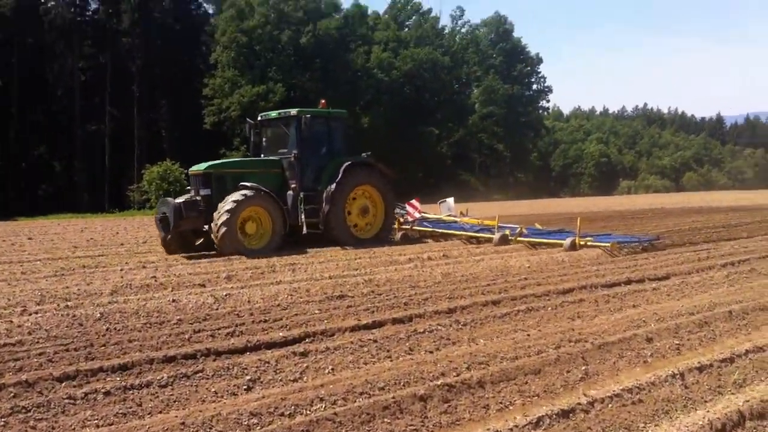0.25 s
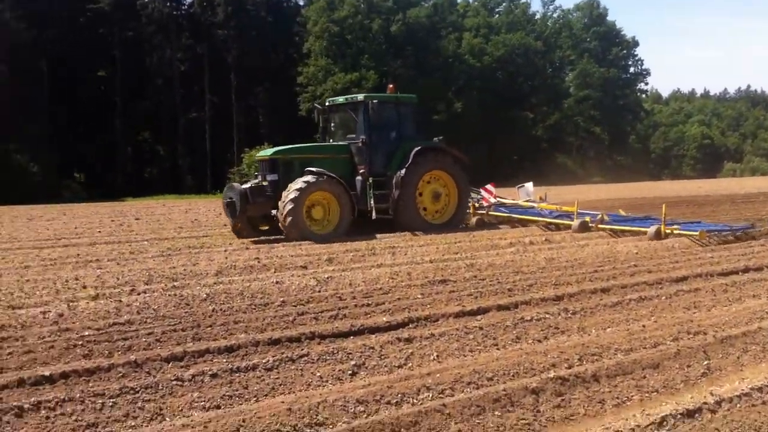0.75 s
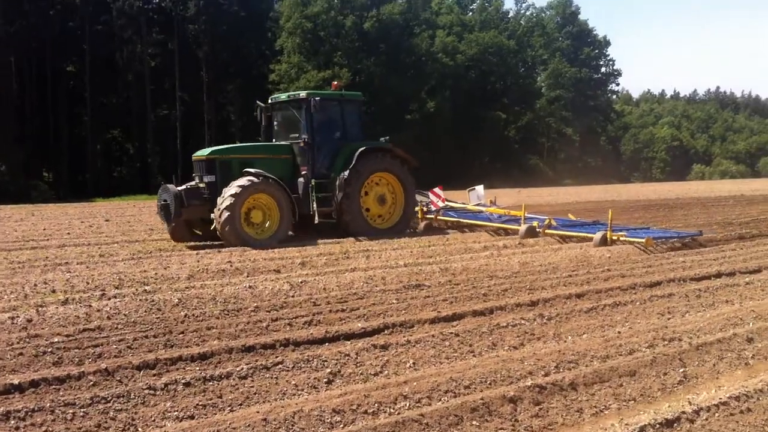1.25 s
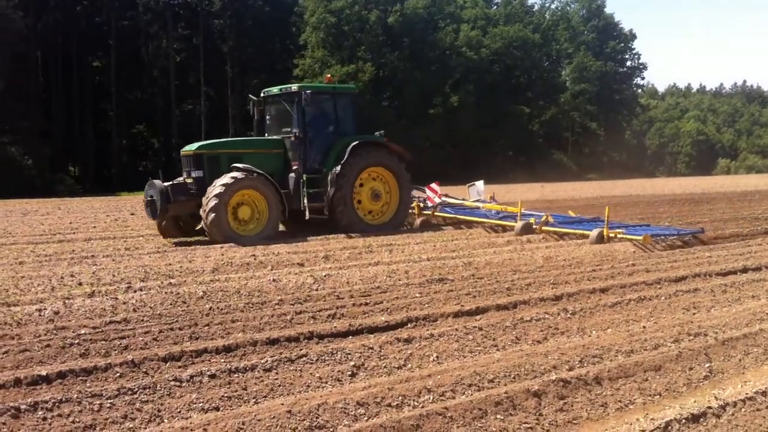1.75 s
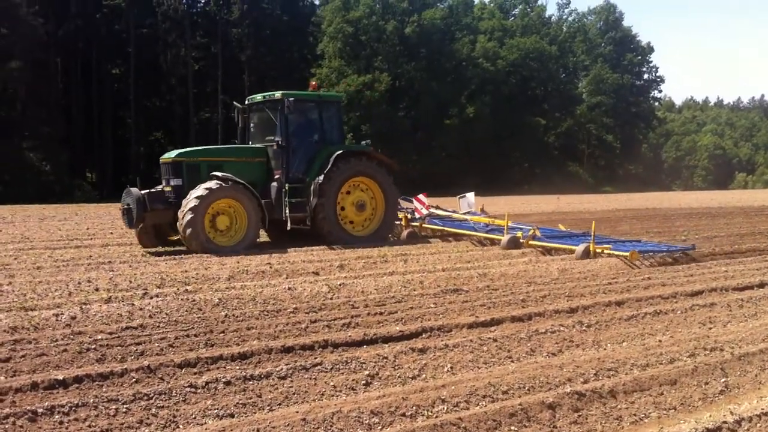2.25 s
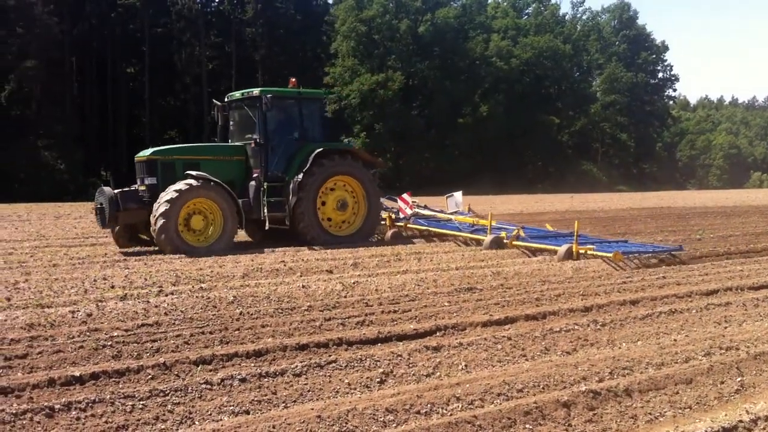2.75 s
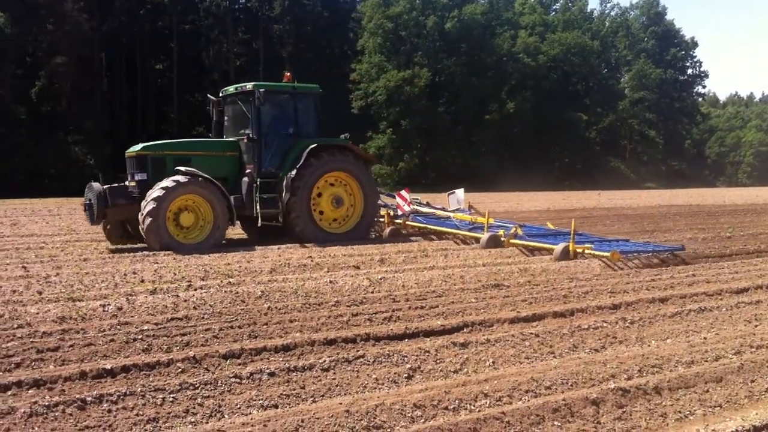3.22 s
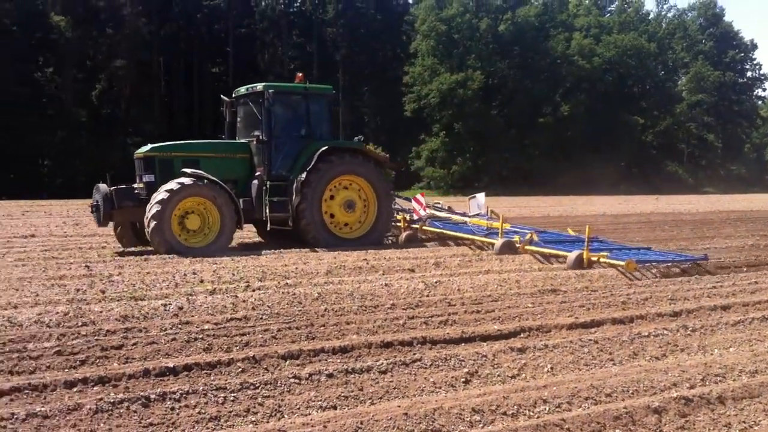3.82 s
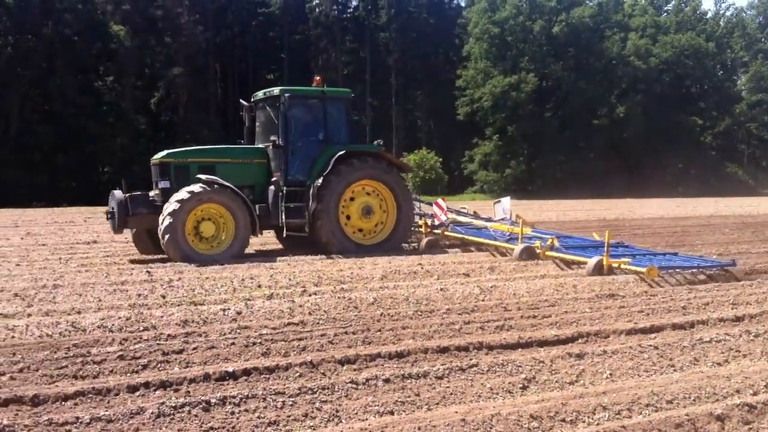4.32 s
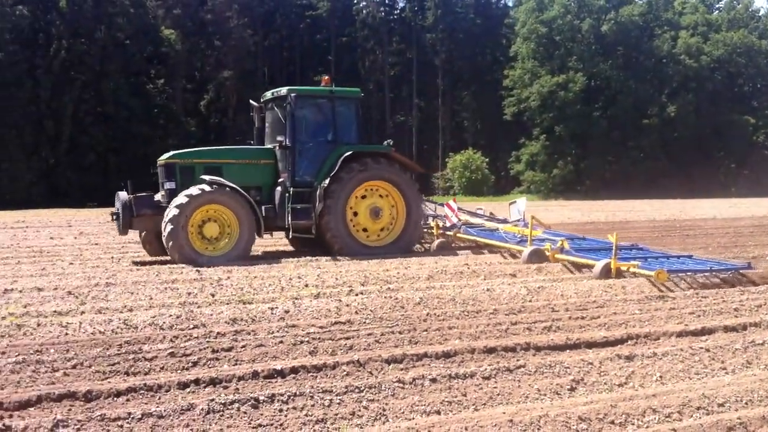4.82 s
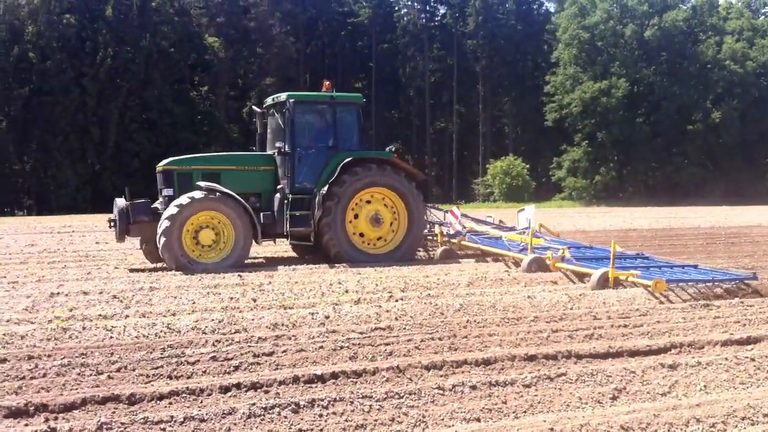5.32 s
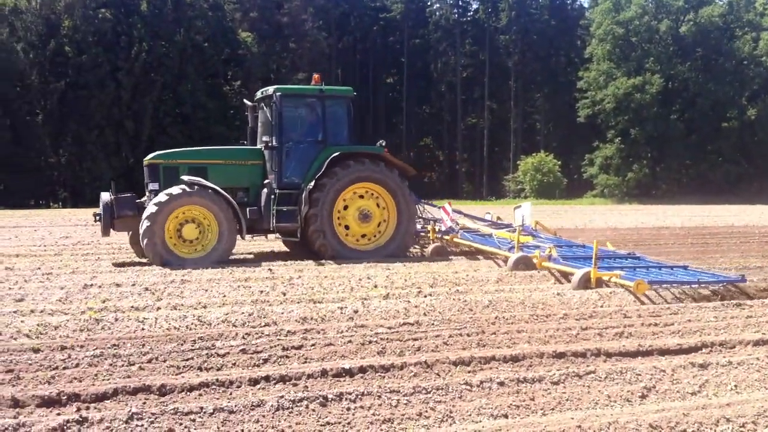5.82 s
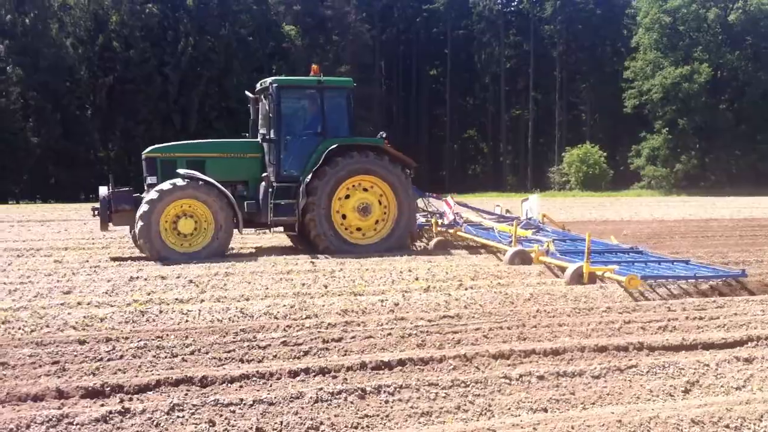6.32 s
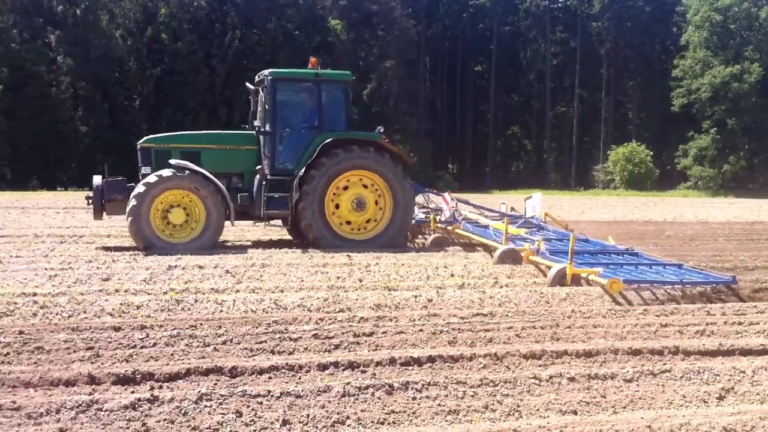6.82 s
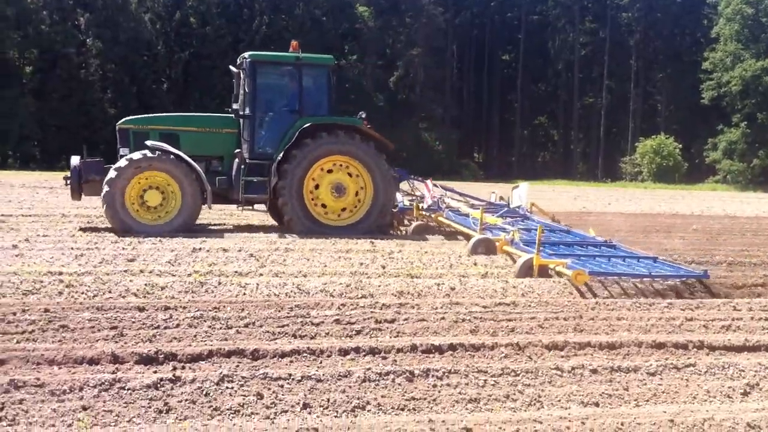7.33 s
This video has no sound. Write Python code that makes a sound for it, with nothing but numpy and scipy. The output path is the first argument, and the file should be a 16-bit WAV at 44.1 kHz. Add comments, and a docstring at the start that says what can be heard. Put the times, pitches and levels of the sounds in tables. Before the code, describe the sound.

Outdoors in an open field, strong wind thumps, rumbles and crackles on an unprotected microphone, loudest in the first three seconds. Behind it a diesel tractor runs at constant speed with a hard, fast, uneven knock and midrange roar. As the gusts thin out, the engine grows clearer and slowly louder, and the fine gritty hiss of a harrow dragged through dry soil rises with it.

```python
"""Gusts of wind slap and buffet a bare microphone; behind them a six-cylinder diesel tractor knocks,
dragging a spring-tine harrow over dry soil and coming slowly abreast. Each firing excites block
resonances with noise that partly repeats every cycle; engine orders are sines. The tines are flickering
bands of grit noise, flicked stones short wave packets. Wind is noise bands in bursts plus low packets."""
import sys
import numpy as np
from scipy import signal
from scipy.io import wavfile
from scipy.ndimage import uniform_filter1d

SR = 44100
rng = np.random.default_rng(int(sys.argv[2]) if len(sys.argv) > 2 else 0)


def master(y):
    """Save y as 16-bit WAV."""
    cut = np.clip(np.atleast_2d(y).T, -1, 1)
    pcm = np.round(cut * 32767)  # scale
    wavfile.write(sys.argv[1], SR, pcm.astype(np.int16))


N = 333837


def undb(db):
    """Amplitude ratio of a level in dB."""
    return 10 ** (np.asarray(db) / 20)


def unit(x):
    """Scale to an RMS of 1."""
    return x / np.sqrt(np.mean(x ** 2))


def curves(table):
    """Columns of a table after t/s, interpolated to one value a sample."""
    s, *columns = np.transpose(table)
    return [np.interp(np.arange(N) / SR, s, c) for c in columns]


def band(x, hz, width_hz):
    """Steep band-pass."""
    edges_hz = np.clip([hz - width_hz / 2, hz + width_hz / 2], 20, SR / 2.2)
    return signal.sosfilt(signal.butter(3, edges_hz, "bandpass", fs=SR, output="sos"), x)


def walk(rate_hz):
    """Random levels, rate_hz a second, joined smoothly; RMS 1."""
    levels = rng.standard_normal(int(N / SR * rate_hz) + 2)
    joined = np.interp(np.arange(N) * rate_hz / SR, np.arange(len(levels)), levels)
    return unit(uniform_filter1d(joined, int(SR / rate_hz / 2)))


def blows(table, cycles):
    """One short wave packet per row (t/s, level/dB, f/Hz); the envelope peaks after `cycles` periods."""
    out = np.zeros(N)
    for (s, db, hz), turn in zip(table, rng.random(len(table))):
        t = np.arange(int(6 * cycles / hz * SR)) / SR * hz / cycles
        at = int(s * SR)
        packet = t * np.exp(1 - t) * np.sin(2 * np.pi * (cycles * t + turn))
        out[at:at + len(t)] += undb(db) * packet[:N - at]
    return out


# cycle rate as heard, dropping slightly by Doppler as the tractor comes abreast: t/s, rate/(cycles/s)
CYCLE_RATE = [(0, 14.2), (3, 14.197), (4.4, 14.187), (5.5, 14.17), (7.57, 14.13)]
# block resonances: f/Hz, width/Hz, level/dB, share repeating each cycle (capped at 0.75 in use),
# knock of cylinders 1-6 over the steady rattle/dB (six columns)
BLOCK_MODES = [(198, 250, -7, 0.33, -6, -12, -11, 30.5, 0, 28),
               (374.3, 61, -8.5, 0.13, 12, -6, 6, 10, -27, 4),
               (708, 103, -3.5, 0.5, -6.5, 6, 9, 3, 10, -21),
               (906, 270, 1.5, 0.42, 6, -11, 6, 4.5, -7, -6.5),
               (1043, 257, -1, 0.42, 4.5, -5, 4, 2.5, -3, -2.5),
               (1264, 180, -9, 0.15, -26, 4, -10, -12, -5, -26),
               (1665, 260, -8.5, 1, 2, 4.5, -3, -10, -1, 3), (1893, 330, -6.5, 0.59, 0, 0, 9, -9, 6, -1),
               (2412, 300, -4.5, 0.81, -2.5, 0, 5, 1, -8, 0), (2626, 292, -3, 1, 4, 5, 13, -6, 9, 9),
               (3276, 380, -16, 0.63, -21, -22, -17, -19, -15, -12),
               (3710, 440, -16.5, 0.11, -16, -19, -16, -8, -16, -13),
               (4904, 440, -13, 0.12, 5, -2, 3, 4.5, -30, -8), (5943, 480, -13, 0.24, 7, 4, 0, -2, 1, -6),
               (6575, 560, -17, 0.27, -5, 3, -2, -35, -12, -27)]
# clean engine orders: multiple of the cycle rate, level over the engine level/dB
ENGINE_ORDERS = [(30, -15), (48, -8), (57, -11), (60, -7.5), (63, -12), (72, -12), (74, -11), (77, -6.5),
                 (82, -14), (88, -16), (96, -19), (124, -18), (132, -15), (166, -17), (176, -15),
                 (180, -20), (190, -16)]
FIRST_FIRES_S = 5.6625  # a firing of cylinder 1; fixes the phase of the cycle
KNOCK_S = 0.0031  # rise time and decay constant of one knock


def engine(boom_db, ring_db):
    """Six knocks a cycle ring the block; part of the rattle repeats from cycle to cycle, part is new."""
    hz, = curves(CYCLE_RATE)
    turns = np.cumsum(hz) / SR
    turns = turns - turns[int(FIRST_FIRES_S * SR)]
    firing = np.floor(6 * turns).astype(int)
    since_s = (6 * turns - firing) / (6 * hz)
    scatter_db = 1.5 * rng.standard_normal(1024)[firing % 1024]
    knock = undb(scatter_db) * since_s / KNOCK_S * np.exp(1 - since_s / KNOCK_S)

    # two repeating patterns cross-fade as the view of the engine turns
    view_rad = 5 * np.arange(N) / N + .3 * walk(2)
    cycle_len = int(SR / hz.mean())
    place = np.round(turns % 1 * cycle_len).astype(int) % cycle_len
    out = 0
    for f, width_hz, db, share, *cylinder_db in BLOCK_MODES:
        share = np.clip(share, 0, .75)
        old, new = rng.standard_normal((2, cycle_len))[:, place]
        repeating = np.cos(view_rad) * old + np.sin(view_rad) * new
        rattle = np.sqrt(share) * repeating + np.sqrt(1 - share) * rng.standard_normal(N)
        ring = band(rattle * (1 + undb(cylinder_db)[firing % 6] * knock), f, width_hz)
        level_db = db + 0.44 * walk(9) + boom_db * (f < 1400) + ring_db * (4500 < f < 6300)
        out = out + undb(level_db) * unit(ring)

    for (order, db), start in zip(ENGINE_ORDERS, rng.random(len(ENGINE_ORDERS))):
        level_db = db + 2 * walk(3) + boom_db * (order < 100)
        out = out + undb(level_db) * np.sqrt(2) * np.sin(2 * np.pi * (order * turns + start))
    return out, knock


def roar():
    """Fan, tyres and soil fill gaps between block modes: a broad roar, strongest near 2.9 kHz, weaker above 4 kHz."""
    out = 0
    # f/Hz, width/Hz, level/dB
    for hz, width_hz, db in [(1530, 400, -16.5), (2200, 480, -14.5), (2887, 220, -12.5),
                             (4330, 680, -19.5), (5400, 750, -19)]:
        out = out + undb(db + 1.2 * walk(9.2)) * unit(band(rng.standard_normal(N), hz, width_hz))
    return out


# tractor: t/s, engine level/dB, boom under 1.4 kHz over it/dB, ring at 5-6 kHz over it/dB
TRACTOR = [(0.0, -42.5, 0, -4), (0.21, -42, -2, 2.5), (0.44, -38.5, -5, -4), (1.12, -43, 1, -2),
           (1.64, -39, -1.5, -4), (2.38, -40, -0.5, -3), (2.61, -38.5, -1, 0.5), (2.95, -42.5, 1.5, -1),
           (3.14, -41.5, 0, 1.5), (4.49, -37.5, -0.5, -2), (6.3, -36.5, 1, 0), (6.89, -35, 0, -2.5),
           (7.57, -35, 0, -4.5)]


def tractor():
    """Block, orders and roar follow one engine level; boom and ring tilt the engine's spectrum."""
    engine_db, boom_db, ring_db = curves(TRACTOR)
    block, knock = engine(boom_db, ring_db)
    return undb(engine_db) * (block + roar()), knock


# spectrum of tines in dry soil: f/Hz, relative density/(dB per Hz)
SOIL = [(3820, -30), (6500, 2), (9330, -5.5), (10900, -2.5), (13100, -6), (15700, -12)]


def harrow(knock):
    """Dense grit on the tines flickers band by band as the frame jolts; a trace of the firing rides on it."""
    hz, db = np.transpose(SOIL)
    jolt = walk(60)
    grit = undb(1.8 * rng.exponential(size=N))
    out = 0
    for f in np.arange(7200, 15700, 700.):
        flicker_db = f / 2.2e4 * (jolt + 2 * walk(45))
        level_db = np.interp(np.log(f), np.log(hz), db) + flicker_db
        out = out + undb(level_db) * band(grit * rng.standard_normal(N), f, 740)
    return unit(out) * (1 + 0.17 * knock)


# tine hiss, growing as the harrow draws near: t/s, level/dB
TINES = [(0.0, -55), (0.46, -52), (0.88, -55), (3.33, -54), (6.03, -49.5), (7.57, -49.5)]
# frame jolts that briefly shift the hiss: t/s, level change/dB
JOLTS = [(.27, 6), (.66, 2), (.77, 4), (1.43, 3), (2.4, -1), (2.62, 4), (2.8, 4), (3.92, 4), (4.11, 1),
         (4.3, 3), (5.1, 2), (5.21, 3.5), (5.4, 3), (6.94, 2), (7.1, 3), (7.29, 4), (7.49, 2)]
JOLT_S, SWAY_DB = 0.014, 0.3  # 1/e half length of a jolt; RMS of the random sway


def tine_db():
    """Level of the hiss: the approach, a slow sway and the jolts."""
    t = np.arange(N) / SR
    approach_db, = curves(TINES)
    jolts_db = sum(db * np.exp(-((t - s) / JOLT_S) ** 2) for s, db in JOLTS)
    return approach_db + SWAY_DB * walk(6.9) + jolts_db


# stones flicked by a tine: t/s, level/dB, f/Hz
STONES = [(1.411, -31, 8150), (7.285, -30, 11600), (7.485, -30, 11700)]


def stones():
    """A flicked stone rings as one short, high wave packet."""
    return blows(STONES, cycles=2.1)


# single eddies slapping the microphone: t/s, level/dB, f/Hz, snap level/dB
SLAPS = [(0.097, -7.5, 293, -30), (0.204, -13, 318, -12.5), (0.223, -14, 254, -14), (0.338, -9, 264, -31),
         (0.405, -13, 260, -0.5), (0.556, -20, 140, -8.5), (0.621, -7, 216, -13), (0.645, -8, 180, -10.5),
         (0.726, -14, 207, -36), (0.869, -7, 234, -16), (0.894, -10, 170, -30), (0.922, -21, 253, -21),
         (0.968, -17, 196, -15), (1.012, -17, 250, -9.5), (1.053, -2.5, 178, -21), (1.12, -21, 218, -9),
         (1.164, -9.5, 210, -22), (1.188, -7, 240, -31), (1.225, -14, 153, -20), (1.468, -6.5, 300, -23),
         (1.548, -7, 147, -10.5), (1.691, -12, 223, -28), (1.812, -10, 212, -11.5),
         (2.049, -26, 196, -11.5), (2.143, -8, 227, -22), (2.296, -6.5, 196, -13), (2.309, -6, 170, -8.5),
         (2.39, -8, 295, -20), (2.423, -12, 240, -12), (2.534, -7, 296, -31), (2.636, -19, 187, -16),
         (2.705, -13, 153, -13), (2.813, -23, 227, -13.5), (2.828, -6, 182, -7), (3.319, -12.5, 223, -23),
         (3.417, -16, 286, -24), (3.653, -10, 266, -30), (3.977, -14, 139, -17), (4.362, -14, 160, -19),
         (4.479, -8, 241, -26), (4.53, -7, 314, -36), (4.57, -9.5, 200, -32), (4.929, -7.5, 221, -17),
         (4.968, -10, 222, -36), (4.989, -10.5, 256, -32), (5.064, -12.5, 195, -31), (6.9, -20, 242, -32),
         (6.939, -10.5, 163, -20)]


def slaps():
    """An eddy hits the microphone: a low swing, its sharp front a quick one at three times the pitch."""
    s, level_db, hz, snap_db = np.transpose(SLAPS)
    snaps = blows(np.c_[s + .002, snap_db, 3 * hz], cycles=.6)
    return blows(np.c_[s, level_db, hz], cycles=0.49) + snaps


def wind():
    """Eddies roll over the port: rumble bursts that tilt with brightness, crackle and slaps."""
    gust_db, bright_db, torn = gusts()
    eddy, flare = walk(80), walk(220)
    rumble = 0
    # f/Hz, width/Hz, level/dB, tilt/(dB per dB of brightness), flare/dB
    for hz, width_hz, db, tilt, flare_db in [
            (71.6, 21, -23.0, 0.22, 1.1), (127.4, 73.6, -6, 0.32, 0.57), (181.4, 89.6, 1, 0.0074, 0.56),
            (277.8, 125, -1.0, 0.029, 1.9), (389.7, 159, -1.5, 0.78, 4.5), (532, 220, -3.0, 1.19, 0.72),
            (723, 230, -7, 1.85, 1.1)]:
        burst = undb(0.32 * eddy + flare_db * flare)
        noise = unit(band(burst * rng.standard_normal(N), hz, width_hz))
        rumble = rumble + undb(db + tilt * bright_db) * noise

    tearing = undb(3.5 * flare) * rng.standard_normal(N)
    crackle = 0
    # f/Hz, width/Hz, level/dB
    for hz, width_hz, db in [(796, 308, -13), (1285, 430, -18.5), (1883, 840, -23.5), (2730, 1700, -36)]:
        crackle = crackle + undb(db) * unit(band(tearing, hz, width_hz))
    return undb(gust_db) * unit(rumble) + torn * crackle + slaps()


def near(s, length_s):
    """Sample numbers around an event, 0.08 s beyond either end."""
    return np.arange(max(int((s - .08) * SR), 0), min(int((s + length_s + .08) * SR), N))


# wind underlying the gusts: t/s, level/dB
BREEZE = [(0, -26), (.07, -29), (.44, -18.5), (.84, -26), (1.15, -23), (1.27, -34.5), (1.43, -37),
          (1.62, -30), (1.92, -21.5), (2.95, -22.5), (3.12, -33), (3.3, -31.5), (4.2, -30.5), (4.65, -26),
          (4.84, -37), (5.14, -30), (6.05, -33), (6.2, -36), (6.5, -37.5), (6.57, -29), (7.2, -27),
          (7.57, -36)]
# gusts: start t/s, length/s, level/dB, brightness (upper rumble over lower)/dB, crackle level/dB
GUSTS = [(0.091, 0.084, -19.5, 1.5, -20.5), (0.179, 0.12, -18, -1, -24.5), (.342, 0.048, -21.5, 2, -25),
         (0.402, 0.032, -15, -0.5, -11), (0.436, 0.081, -15.5, -5, -15), (0.515, 0.15, -15, -3.5, -16),
         (0.71, 0.062, -18, -16, -45), (0.861, 0.082, -15.5, -1, -15), (0.961, .14, -18.5, -0.5, -20),
         (1.105, 0.14, -17.5, -5.5, -26), (1.467, 0.019, -12.5, -8, -25), (1.524, 0.052, -17, -5, -18),
         (1.692, 0.085, -19, -2, -20), (1.787, .12, -20.5, 0, -19), (2.003, 0.067, -17.5, -5, -19),
         (2.121, 0.068, -14, -4, -21), (2.27, 0.077, -20, 0, -31), (2.388, .11, -18, -0.5, -29),
         (2.536, 0.081, -20.5, -0.5, -28), (2.62, 0.12, -17.5, -9, -35), (2.783, .16, -18, -2, -18.5),
         (2.959, 0.068, -25.5, 3.5, -32), (3.323, 0.074, -26, -3, -35), (3.399, 0.13, -20, -3.5, -35),
         (3.608, 0.11, -24, -5, -42), (3.896, 0.068, -23.5, -3.5, -40), (3.958, 0.098, -20.5, -1.5, -36),
         (4.059, .05, -24.5, -17, -45), (4.156, 0.043, -30, -18, -46), (4.257, 0.03, -34.5, -7, -49),
         (4.347, 0.12, -21, -9.5, -40), (4.451, 0.092, -23.5, -2.5, -38), (4.875, .03, -26.5, -8, -44),
         (4.906, 0.048, -18.5, -7, -38), (4.97, 0.048, -21, -5.5, -40), (5.165, 0.025, -28, -9, -45),
         (5.192, .11, -20, -4.5, -38), (5.309, 0.11, -25, -3, -40), (5.487, 0.056, -26, -10, -46),
         (5.696, 0.12, -29, -16, -50), (5.904, 0.22, -33, -15, -50), (6.687, .13, -24.5, -10, -44),
         (6.885, 0.16, -25.5, -20, -48), (7.024, 0.17, -29, -9, -46)]
BREEZE_BRIGHT_DB, BRIGHT_PER_DB = -9.5, 0.56  # brightness at -30 dB; its rise with breeze level
FLUTTER_DB = -1  # random flutter of the breeze
GUST_RISE_S, GUST_FALL_S = 0.02, 0.024
TEAR_DB, TEAR_RISE_S, TEAR_S = -8, 0.011, 0.026  # crackle around a slap: level over snap, rise, decay


def gusts():
    """Level, brightness and crackle of the wind: gusts rise, hold and fall, adding power to the breeze."""
    breeze_db, = curves(BREEZE)
    power = undb(breeze_db + FLUTTER_DB * walk(30)) ** 2
    # brightness is averaged with power as the weight
    bright = power * (BREEZE_BRIGHT_DB + BRIGHT_PER_DB * (breeze_db + 30.0))
    crackle = np.zeros(N)
    for s, length_s, db, bright_db, crackle_db in GUSTS:
        span = near(s, length_s)
        t = span / SR
        rise = (t - s) / GUST_RISE_S + .5
        fall = (s + length_s - t) / GUST_FALL_S + .5
        shape = np.clip(np.minimum(rise, fall), 0, 1)
        gust_power = (undb(db) * shape) ** 2
        power[span] += gust_power
        bright[span] += gust_power * bright_db
        crackle[span] += undb(crackle_db) * shape ** 2
    for s, _, _, snap_db in SLAPS:
        span = near(s, .1)
        t = span / SR - s
        crackle[span] += undb(snap_db + TEAR_DB) * np.exp(np.minimum(t / TEAR_RISE_S, -t / TEAR_S))
    return 10 * np.log10(power), bright / power, crackle


def scene():
    """Tractor, harrow, stones and wind summed to one channel."""
    machine, knock = tractor()
    tines = undb(tine_db()) * harrow(knock)
    return (machine + tines + stones() + wind())[None]


TOP_HZ = 15780


def record(dry):
    """The microphone drops deep bass; its amplifier flattens loud slaps, adds low flicker; the top is cut."""
    thin = signal.sosfilt(signal.butter(3, 85., "highpass", fs=SR, output="sos"), dry)
    flat = thin / (1 + (np.abs(thin) / .76) ** 6) ** (1 / 6)
    flicker = undb(-71) * unit(band(rng.standard_normal(N), 40., 36.))
    return signal.sosfilt(signal.ellip(10, .2, 70, TOP_HZ, fs=SR, output="sos"), flat + flicker)


dry = scene()
out = record(dry)
master(out)
```